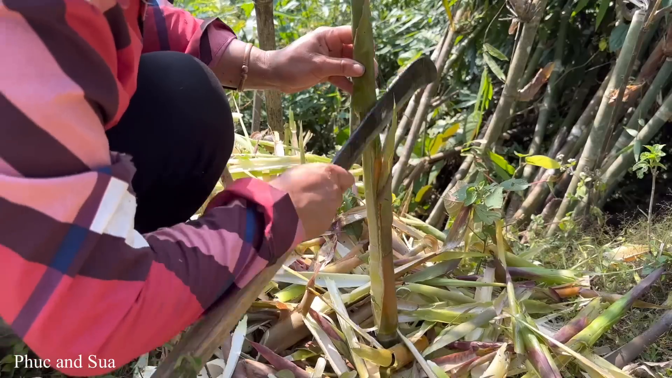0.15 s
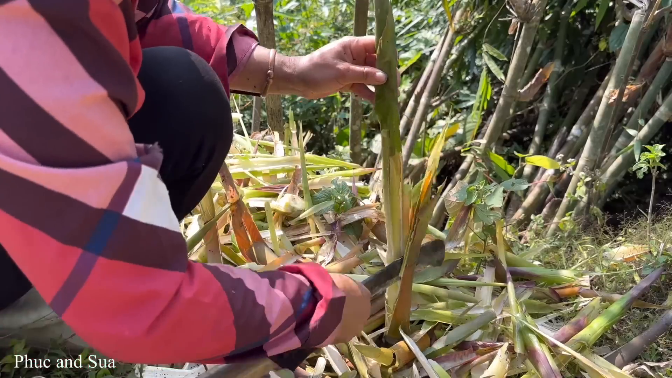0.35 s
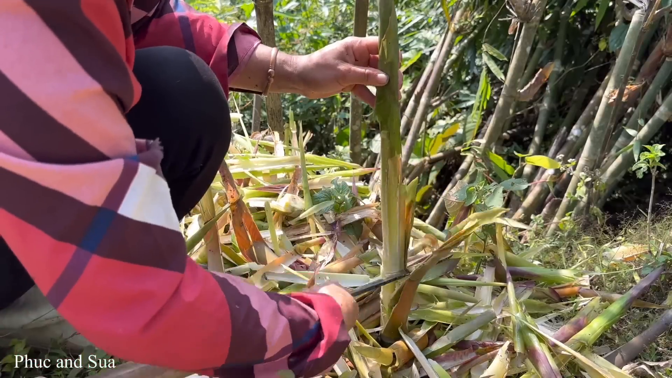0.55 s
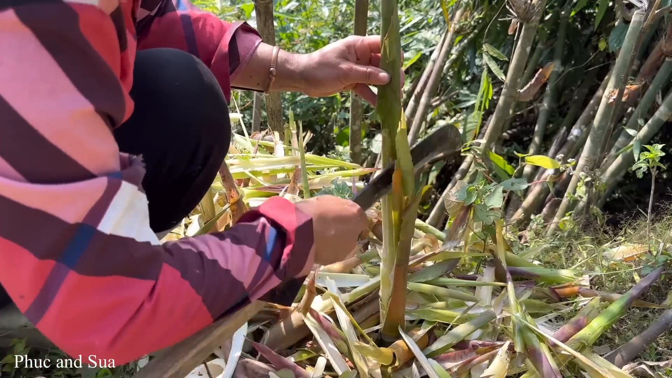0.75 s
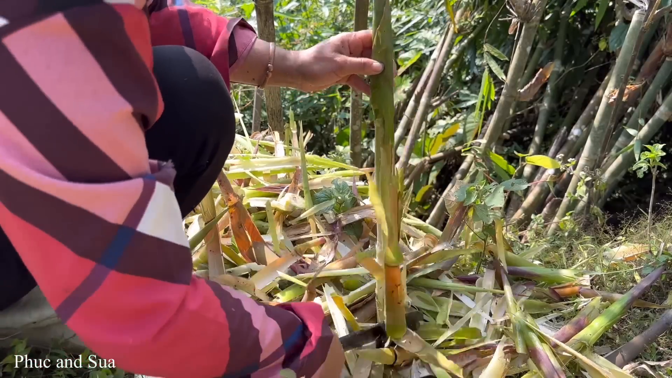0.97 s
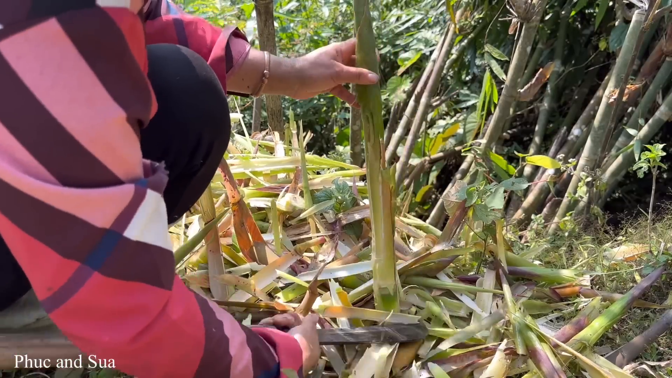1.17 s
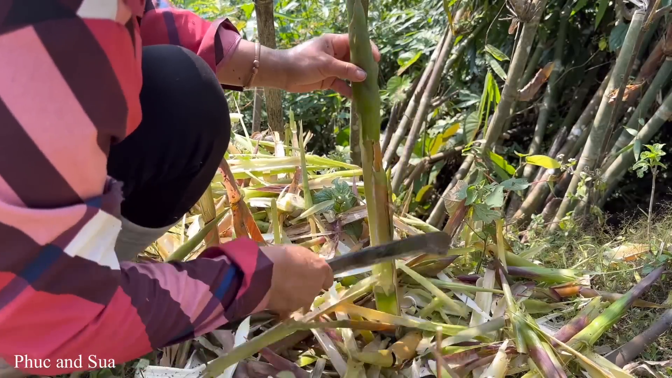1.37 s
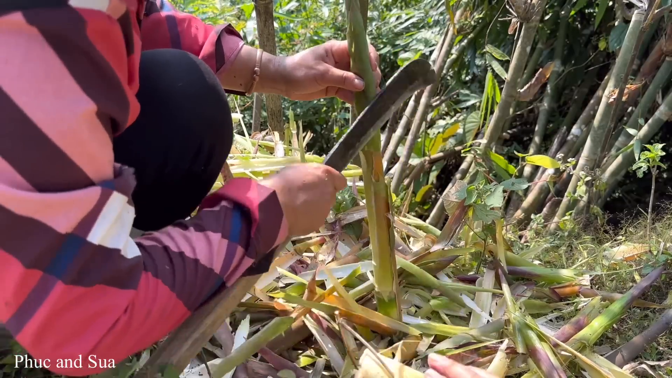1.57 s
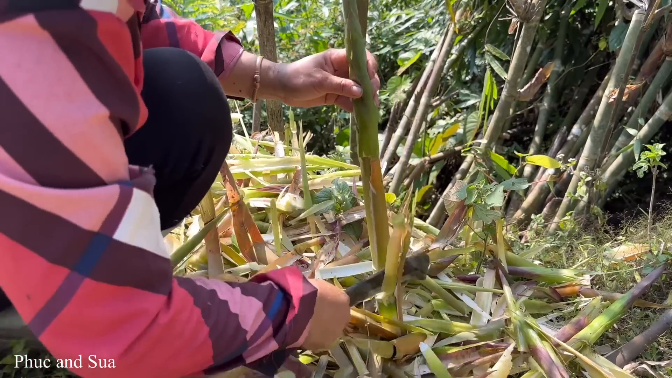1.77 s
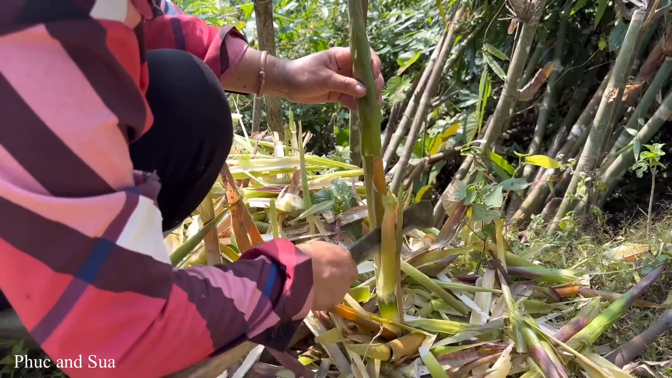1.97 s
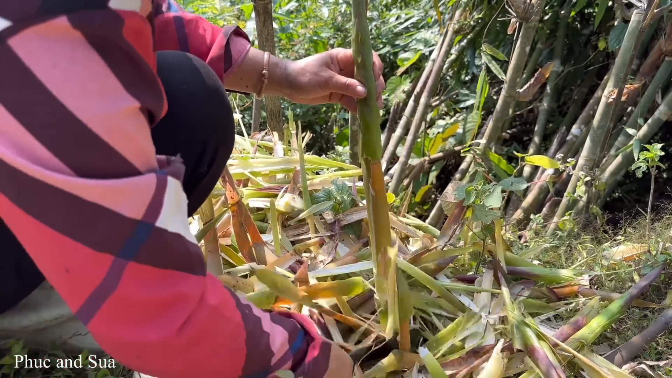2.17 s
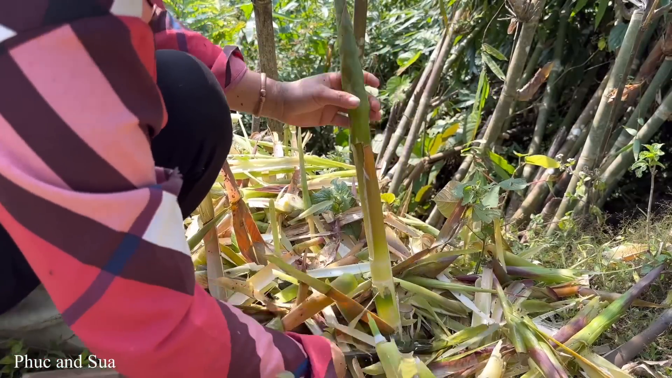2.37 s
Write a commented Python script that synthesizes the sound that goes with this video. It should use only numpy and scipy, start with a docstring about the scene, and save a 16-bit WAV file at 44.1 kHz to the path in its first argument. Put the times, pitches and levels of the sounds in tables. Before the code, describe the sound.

A machete strips fibrous husk from a standing shoot, close and dry outdoors. A bright ripping crack at 0.2 s; small ticks from 0.46 lead into a sharp snap cluster around 0.53. A brief rustle, then the hardest crack with a low thud at 0.93. After a quiet gap, softer splintering and scraping at 1.67-1.87, then a knocking crack at 2.17. Faint husk rustle ends it, over thin hiss and rumble.

```python
"""In a forest, close to the microphone, a machete strips the husk from a standing bamboo shoot.
Five strokes tear fibres as trains of tiny fractures; single ribs snap and ring the hollow sheath's modes.
The shoot answers with filtered-noise thuds, two-note knocks and falling chirps of bending waves.
Scrapes, dull bumps and rustling husks are shaped noise and crackle, over a low rumble and a thin hiss.
Random decaying tails give the echoes, and two microphone ports hear them with unlike phase and level."""
import sys
import numpy as np
from scipy import signal
from scipy.fft import rfft, irfft, next_fast_len
from scipy.io import wavfile

SR = 44100
rng = np.random.default_rng(int(sys.argv[2]) if len(sys.argv) > 2 else 0)


def master_out(mix):
    """Clip the mix to full scale and print it as 16-bit PCM to the path in sys.argv[1]."""
    frames = np.transpose(np.atleast_2d(mix))
    ceiling = np.clip(frames, -1, 1)
    pcm = np.round(ceiling * 32767).astype(np.int16)
    wavfile.write(sys.argv[1], SR, pcm)


N = 108045
T = np.arange(N) / SR  # time [s]


def amp(db):
    """Logarithmic level: decibels become a gain."""
    return 10 ** (np.asarray(db) / 20)


def unit(x):
    """Power normalisation: scales to rms 1."""
    return x / np.sqrt(np.mean(x ** 2) + 1e-20)


def read(points, hz):
    """Logarithmic frequency scale: interpolates a table along it."""
    f, value = np.transpose(points)
    return np.interp(np.log(hz + 1), np.log(f + 1), value)


def add(mix, s, sound):
    """Superposition: mixes a sound in at a time."""
    part = mix[max(round(s * SR), 0):][:len(sound)]
    part += sound[:len(part)]


def colour(x, points, treble_db=0, size=2048):
    """Minimum-phase filtering: a causal filter of unit energy with the given spectrum and a treble tilt."""
    hz = np.fft.rfftfreq(size, 1 / SR)
    tilt = read([(1500, -0.22), (3500, -0.86), (8000, 0.69)], hz)  # (frequency [Hz], share of treble_db)
    db = read(points, hz) + treble_db * tilt
    log_gain = np.log(amp(np.r_[db, db[-2:0:-1]]))
    # The phase follows from the log gain by a Hilbert transform.
    taps = np.fft.ifft(np.exp(np.conj(signal.hilbert(log_gain)))).real
    return signal.fftconvolve(x, taps / np.linalg.norm(taps))[:len(x)]


def crackle(per_s, spread_db, size):
    """Shot noise: random tiny fractures of uneven strength, rms 1."""
    hit = rng.random(size) < per_s / SR
    strength = amp(spread_db * np.minimum(rng.standard_normal(size), 2))
    sign = rng.choice([-1, 1], size)
    return unit(hit * sign * strength)


BUNDLE_S, BUNDLE_DB = .0015, 3  # spacing and spread of the surges: fibres give way in bundles


def bundles(size):
    """Amplitude modulation: quick random surges of gain, rms 1."""
    knots = np.clip(rng.standard_normal(size), -2, 2)
    surge = np.interp(T[:size] / BUNDLE_S, np.arange(size), knots)
    return unit(amp(BUNDLE_DB * surge))


def swells(rows):
    """Gaussian envelopes: the sum of bell-shaped movements."""
    return sum(amp(db) * np.exp(-.5 * ((T - s) / width) ** 2) for s, width, db in rows)


# Spectrum of the low outdoor rumble: (frequency [Hz], relative level [dB])
RUMBLE_SPECTRUM = [(18, -22), (32, -16), (55, -2.5), (119, -1.5), (215, -7), (1490, -13), (3200, -19.5),
                   (9000, -30), (15500, -41.5)]
RUMBLE_DB = -49.5
# Spectrum of the thin hiss: (frequency [Hz], relative level [dB])
HISS_SPECTRUM = [(1000, -17), (3000, 4), (5000, 1.5), (8300, 11.5), (10500, 3), (15500, 9)]
# Swelling of the hiss: (time [s], level [dB])
HISS_SWELL = [(0, -54.5), (.07, -53.5), (.16, -49), (.3, -46.5), (.42, -56.5), (.65, -45), (1.1, -45),
              (1.25, -52.5), (1.45, -52), (1.56, -56.5), (1.64, -45.5), (1.94, -54.5), (2.08, -52),
              (2.45, -50)]


def wash():
    """Broadband noise: a hiss of dense crackle that swells and sinks, plus a steady rumble."""
    hiss = colour(crackle(14000, 5.1, size=N), HISS_SPECTRUM)
    hiss = hiss * amp(np.interp(T, *np.transpose(HISS_SWELL)))
    rumble = colour(rng.standard_normal(N), RUMBLE_SPECTRUM)
    return hiss + amp(RUMBLE_DB) * rumble


def air(apart_db=-9):
    """Partial coherence: a wash common to both sides, plus a weaker one of its own on each."""
    return wash() + amp(apart_db) * np.array([wash(), wash()])


# Husks shifting on the ground: (middle time [s], half length [s], level [dB])
HUSK_SHIFTS = [(.09, 0.042, -47), (.76, 0.019, -48.5), (.885, 0.015, -37), (1.08, 0.1, -45.5),
               (1.36, 0.059, -51), (2.0, 0.017, -48), (2.39, 0.074, -46.5)]
# Spectrum of the dry litter: (frequency [Hz], relative level [dB])
LITTER_SPECTRUM = [(150, -40), (600, 4.5), (1700, -1.5), (2600, 5), (4500, -4.5), (9000, -2.5), (15500, -6)]


def rustles():
    """Friction of loose husks: sparse, bundled crackle under bell-shaped swells."""
    fractures = crackle(1000, 3.8, size=N) * bundles(size=N)
    return colour(fractures * swells(HUSK_SHIFTS), LITTER_SPECTRUM)


# Main pitch of the sheath, which changes from strip to strip: (time [s], pitch [Hz])
SHEATH_NOTES = [(.21, 2630), (.253, 2353), (.48, 2440), (.527, 2555), (.93, 2786), (1.68, 3540),
                (1.71, 2710), (2.18, 2730)]


def sheath_pitch(s):
    """Resonance tuning: the main pitch of the sheath at a time."""
    return np.interp(s, *np.transpose(SHEATH_NOTES))


# Modes of the hollow sheath: (multiple of its main pitch, relative level [dB], t60 [s])
SHEATH_MODES = [(.68, -24, 0.017), (1.002, 5.5, 0.013), (1.74, -3.5, 0.013), (2.06, -8.5, 0.015)]
SHEATH_LOW_HZ = 1580  # the sheath radiates little below this


def ring(x, pitch_hz):
    """Modal resonance: the sheath rings briefly at a given pitch, too small to radiate bass."""
    t = T[:SR // 20]
    body = 0
    for ratio, db, t60 in SHEATH_MODES:
        body = body + amp(db - 60 * t / t60) * np.sin(2 * np.pi * ratio * pitch_hz * t)
    body = signal.lfilter(*signal.butter(2, SHEATH_LOW_HZ, "high", fs=SR), body)
    return signal.fftconvolve(x, body / np.linalg.norm(body))[:len(x)]


def splinters(fibres, pitch_hz, spread, count=7):
    """Detuned resonators: each fibre rings one of several strips, pitched around the main note."""
    strip = rng.integers(0, count, len(fibres))
    out = 0
    for k, step in enumerate(np.linspace(-1, 1, count)):
        out = out + ring(fibres * (strip == k), pitch_hz * (1 + spread * step))
    return out


SAG_DB_PER_S = 127  # easing of the force during the hold


def stroke(t, rise, hold, t60):
    """Force envelope: the blade bites, eases as it travels, and lets go."""
    bite = np.minimum(t / rise, 1)
    sag_db = -SAG_DB_PER_S * np.clip(t - rise, 0, hold)
    release_db = -60 * np.maximum(t - rise - hold, 0) / t60
    return bite * amp(sag_db + release_db)


FIBRES_PER_S, FIBRE_SPREAD_DB = 5500, 2.5
THUD_LAG_S, THUD_T60_S = .007, 0.1
KNOCK_WIDTH_HZ = 160  # bandwidth of the knock, which sets its decay
OVERTONE_RATIO, OVERTONE_DB = 1.81, -1  # second mode of the knock
# Spectrum of torn fibre: (frequency [Hz], relative level [dB])
FIBRE_SPECTRUM = [(60, -27.5), (500, -10), (900, -3), (1700, -5.5), (3700, 1), (5200, 0.5), (8300, 3),
                  (11000, -5.5), (15500, -4)]
# Spectrum of dull blows: (frequency [Hz], relative level [dB])
THUD_SPECTRUM = [(40, 7), (120, 6.5), (300, 5), (520, 4.5), (1000, -6.5), (2000, 8.5), (5000, -5.5)]
# Knife strokes: (start time [s], rise [s], hold [s], fade t60 [s], tear level [dB],
# treble tilt [dB], sheath ring level [dB], ring pitch spread [fraction], thud level [dB],
# thud low edge [Hz], knock pitch [Hz], knock level [dB])
STROKES = [(0.198, 0.005, 0.039, 0.065, -17.5, 0.5, -22, 0.08, -46, 610, 800, -43),
           (0.522, 0.0037, 0.0033, 0.043, -20.5, -7, -23, 0, -35.5, 296, 1550, -47),
           (0.907, 0.014, 0.0043, 0.051, -22, -7, -28, 0, -23, 98, 546, -36.5),
           (1.667, 0.017, 0.027, 0.043, -28, -2, -27, 0.33, -34, 111, 660, -44),
           (2.169, 0.002, 0.012, 0.11, -22.5, -3, -30.5, .1, -29, 300, 638, -29)]


def cuts():
    """Fracture and forced vibration: fibres tear in bundles; the shoot thuds and knocks on two notes."""
    out, t = np.zeros(N), T[:SR // 4]
    for (s, rise, hold, t60, tear_db, treble_db, ring_db, spread,
         thud_db, edge_hz, knock_hz, knock_db) in STROKES:
        fibres = crackle(FIBRES_PER_S, FIBRE_SPREAD_DB, size=len(t)) * bundles(size=len(t))
        fibres = fibres * stroke(t, rise, hold, t60)
        tear = colour(fibres, FIBRE_SPECTRUM, treble_db)
        ringing = splinters(fibres, sheath_pitch(s + rise), spread)
        add(out, s, amp(tear_db) * tear + amp(ring_db) * ringing)

        push = rng.standard_normal(len(t)) * stroke(t, rise, hold, THUD_T60_S)
        thud = colour(push, THUD_SPECTRUM)
        thud = signal.lfilter(*signal.butter(2, edge_hz, "high", fs=SR), thud)
        turns = 2 * np.pi * knock_hz * t
        notes = np.cos(turns) + amp(OVERTONE_DB) * np.cos(OVERTONE_RATIO * turns)
        modes = np.exp(-np.pi * KNOCK_WIDTH_HZ * t) * notes
        knock = signal.fftconvolve(push, modes / np.linalg.norm(modes))[:len(t)]
        add(out, s + THUD_LAG_S, amp(thud_db) * thud + amp(knock_db) * knock)
    return out


SPLIT_S, SNAP_S = 0.00028, 0.0023  # build-up of a rib's splitting; span over which its level counts
# Spectrum of a breaking rib: (frequency [Hz], relative level [dB])
CRACK_SPECTRUM = [(100, -71), (1000, -11), (1900, -8.5), (8300, 2.5), (15500, -3)]
# Single ribs breaking: (time [s], crack level [dB], treble tilt [dB], sheath ring level [dB])
RIB_BREAKS = [(0.2024, -14.5, 19, -46), (0.2334, -15.5, -21, -15.5), (0.2527, -15.5, -14, -16),
              (0.3639, -42, 2, -46), (0.4623, -24.5, -8, -22), (.4775, -41, 2, -39), (0.4947, -29, -8, -31),
              (0.5089, -33, -23, -21.5), (0.5234, -15, -1, -14.5), (0.5272, -9.5, -5, -17.5),
              (0.5354, -15.5, 1, -32), (0.5488, -24, -2, -45), (0.5596, -30, -1, -56),
              (0.6162, -28.5, -3.5, -64), (0.9217, -17.5, -3, -15.5), (0.925, -20, 5, -18),
              (0.9328, -6.5, -4.5, -48), (1.6744, -28, 3, -23), (1.691, -29, -1, -24.5),
              (1.7032, -25, 0, -40), (1.7061, -28, -9, -19.5), (1.7706, -34.5, -8.5, -38),
              (1.8289, -30.5, 0, -52), (1.8637, -26, 3, -39.5), (2.1412, -37, -7, -45),
              (2.174, -31, -12, -37), (2.1763, -15.5, -5.5, -33), (2.1871, -20, 2, -31),
              (2.38, -34, -4, -59)]


def snaps():
    """Impulsive excitation: a rib splits in about a millisecond and kicks the sheath."""
    out, t = np.zeros(N), T[:SR // 16]
    kick = 1. * (t == 0)
    for s, crack_db, treble_db, ring_db in RIB_BREAKS:
        split = rng.choice([-1, 1], len(t)) * np.sqrt(t) * np.exp(-t / (2 * SPLIT_S))
        crack = colour(split / np.linalg.norm(split), CRACK_SPECTRUM, treble_db)
        snap = amp(crack_db) * crack + amp(ring_db) * ring(kick, sheath_pitch(s))
        add(out, s, np.sqrt(SNAP_S * SR) * snap)  # from unit energy to rms over the span
    return out


BEND_TOP_HZ, BEND_TRAVEL_S, BEND_SWELL_S = 1950, 0.0044, 0.002
# Breaks that flex the whole shoot: (time [s], peak level [dB])
FLEXES = [(.2335, -27), (.535, -31.5), (1.831, -33.5)]


def bends():
    """Dispersion: short bending waves travel fastest, so the thump arrives as a falling chirp."""
    out, t = np.zeros(N), T[:SR // 32]
    hz = BEND_TOP_HZ / (1 + t / BEND_TRAVEL_S) ** 2
    swell = t / BEND_SWELL_S * np.exp(1 - t / BEND_SWELL_S)
    wave = np.sin(2 * np.pi * np.cumsum(hz) / SR) * swell
    for s, db in FLEXES:
        add(out, s, amp(db) * wave)
    return out


# The blade sliding on the husk: (middle time [s], half length [s], level [dB])
BLADE_SLIDES = [(.505, 0.0094, -37.5), (.556, 0.014, -38), (.893, 0.0016, -30), (.958, 0.015, -38.5),
                (1.657, 0.0058, -31.5), (1.73, 0.028, -43.5), (1.865, 0.023, -45.5), (2.16, 0.01, -43.5)]


def scrapes():
    """Sliding friction: dense crackle in the colour of fibre, under bell-shaped swells."""
    return colour(crackle(6000, 2.8, size=N) * swells(BLADE_SLIDES), FIBRE_SPECTRUM, treble_db=-1.5)


# The blade or a piece of husk reaching the ground: (time [s], level [dB], t60 [s])
GROUND_BUMPS = [(0.932, -35.5, 0.23), (2.189, -36, 0.11)]


def drops():
    """Damped impact: each dull bump is noise with an exponential decay."""
    out, t = np.zeros(N), T[:SR // 8]
    for s, db, t60 in GROUND_BUMPS:
        add(out, s, colour(rng.standard_normal(len(t)) * amp(db - 60 * t / t60), THUD_SPECTRUM))
    return out


SCATTER_DB, SCATTER_S = -11, .0005  # how unlike the two sides are, and how fast that changes


def scatter(x):
    """Source extent: each fibre breaks at its own spot and favours one side or the other."""
    side = unit(np.interp(T / SCATTER_S, np.arange(N), rng.standard_normal(N)))
    return x * (1 + amp(SCATTER_DB) * side * np.array([[1], [-1]]))


def echoes(x, t60_points, delay_s):
    """Diffuse reverberation: scattered reflections, different on each side, with t60 set by frequency."""
    hz, t, z = signal.stft(rng.standard_normal((2, SR // 2)), SR, nperseg=128)
    decay = amp(-60 * t / read(t60_points, hz)[:, None])
    tail = signal.istft(z * decay, SR)[1]
    tail *= np.arange(tail.shape[1]) > delay_s * SR  # silent until the first reflection
    tail /= np.linalg.norm(tail, axis=1, keepdims=True)
    return signal.fftconvolve(x, tail, axes=1)[:, :N]


NEAR_DB, NEAR_T60_S = -7.5, 0.049
BLADE_MOVES_S = .3  # time from one reflection pattern to the next


def near_echoes(x, count=4):
    """Early reflection off arm and ground: patterns cross-fade in a cycle as the blade moves."""
    out = 0
    for k in range(count):
        away = abs((T / BLADE_MOVES_S - k + count / 2) % count - count / 2)
        share = np.cos(np.pi / 2 * np.minimum(away, 1))
        out = out + echoes(x * share, [(20, NEAR_T60_S), (SR / 2, NEAR_T60_S)], delay_s=.0004)
    return out


NOTCH_HZ, NOTCH_WIDTH_HZ, NOTCH_DB = 11175, 517, -28.5  # treble notch of the microphone
# Phase between the two ports: (frequency [Hz], lead of the left [rad])
PORT_LEAD = [(20, 0), (2250, 0), (2950, 2.1), (3300, 1.9), (4200, .4), (5500, .6), (6600, 0), (7350, -2.9),
             (8100, -1), (9100, -.6), (11250, -np.pi), (12200, -3.4), (13300, -5.5), (14200, -2 * np.pi)]
# Level between the two ports: (frequency [Hz], left minus right [dB])
PORT_TILT = [(600, -.4), (1300, -2), (2000, -1.5), (2650, -6), (3500, 3.5), (4900, 1), (5500, 4),
             (6600, .5), (7900, 4), (8900, -1), (11000, 0)]


def microphone(x):
    """Interchannel phase and level difference: two ports hear one sound and share a treble notch."""
    size = next_fast_len(N + SR // 8)
    hz = np.fft.rfftfreq(size, 1 / SR)
    phase, tilt = read(PORT_LEAD, hz), amp(read(PORT_TILT, hz))
    # The pair's summed power stays the same at every frequency.
    pair = np.array([tilt, np.exp(-1j * phase)]) * np.sqrt(2 / (1 + tilt ** 2))
    notch = amp(NOTCH_DB * np.exp(-((hz - NOTCH_HZ) / NOTCH_WIDTH_HZ) ** 2))
    return irfft(rfft(x, size) * pair * notch, size)[:, :N]


FOREST_DB = -28
# Reverberation of the forest: (frequency [Hz], t60 [s])
FOREST_DECAY = [(200, 1), (2500, 0.085), (15000, 0.17)]


def scene():
    """Direct and reflected sound: the work at the shoot, thrown back by the ground and stems around it."""
    work = (cuts() + snaps() + bends() + scrapes() + drops() + rustles())[None]
    near = amp(NEAR_DB) * near_echoes(work)
    far = amp(FOREST_DB) * echoes(work, FOREST_DECAY, delay_s=0.019)
    return microphone(scatter(work) + near + far + air())


CEILING, EDGE_HZ = .85, 15850  # full-scale fraction the peaks approach; top of the band


def record(dry):
    """Soft saturation and band limiting: the recorder rounds off the highest peaks and cuts the top."""
    rounded = CEILING * np.tanh(dry / CEILING)
    lowpass = signal.firwin(255, EDGE_HZ, window=("kaiser", 9), fs=SR)
    return signal.oaconvolve(rounded, lowpass[None], "same")


dry = scene()
out = record(dry)
master_out(out)
```